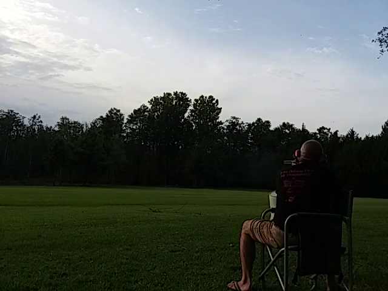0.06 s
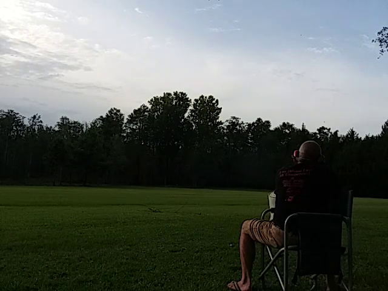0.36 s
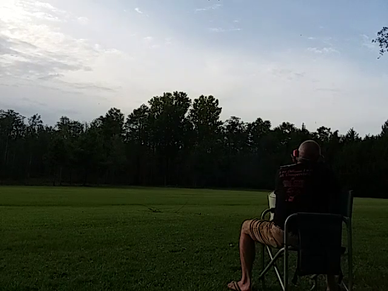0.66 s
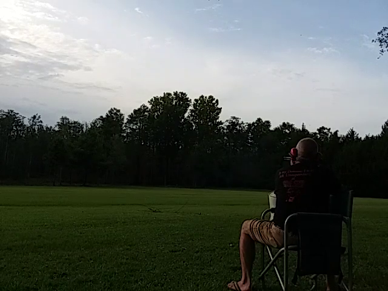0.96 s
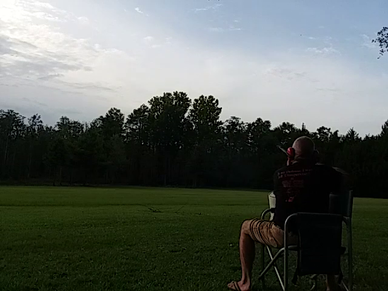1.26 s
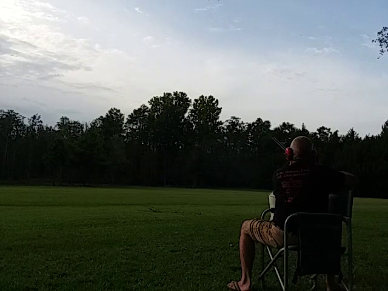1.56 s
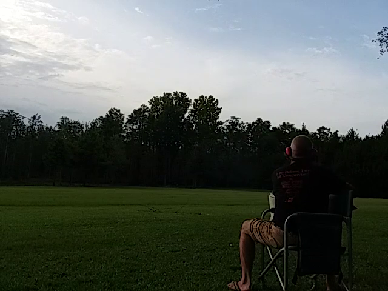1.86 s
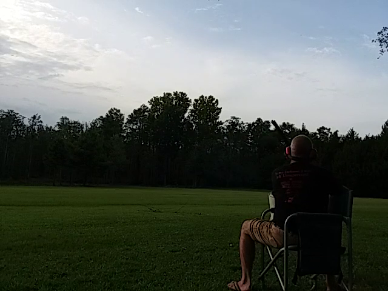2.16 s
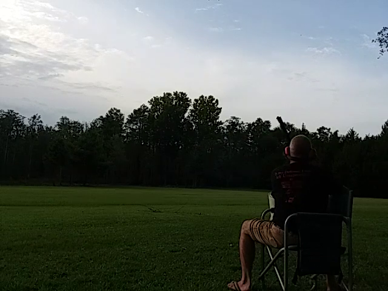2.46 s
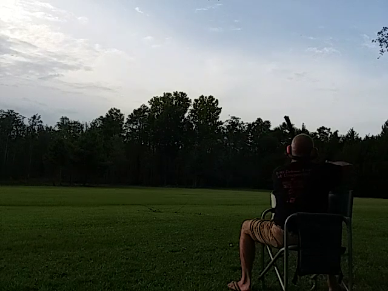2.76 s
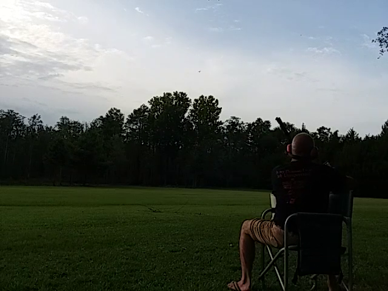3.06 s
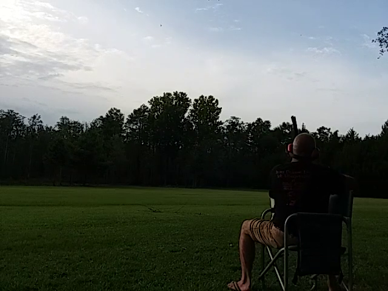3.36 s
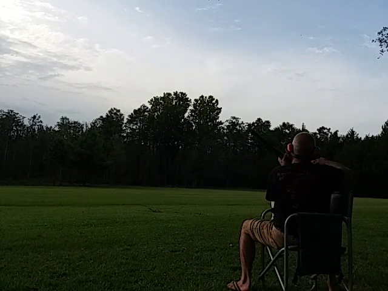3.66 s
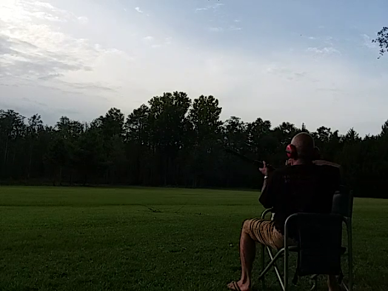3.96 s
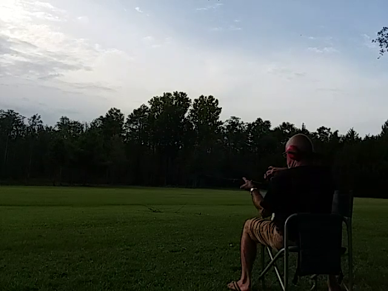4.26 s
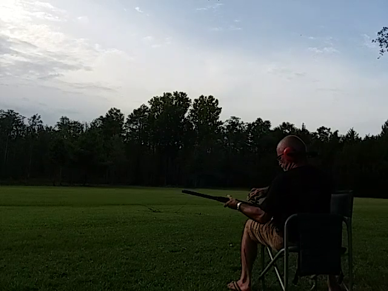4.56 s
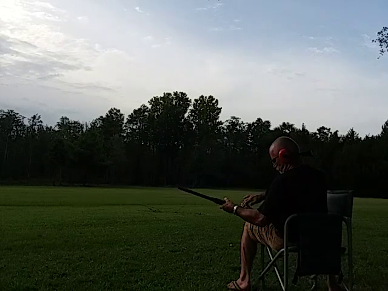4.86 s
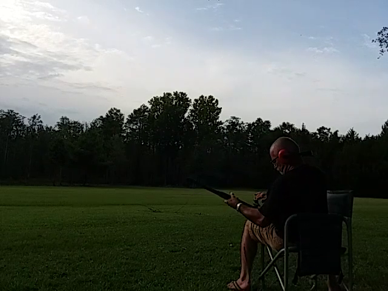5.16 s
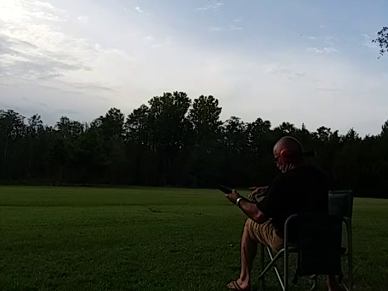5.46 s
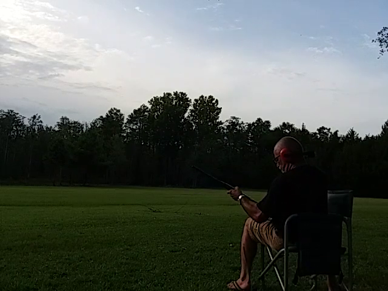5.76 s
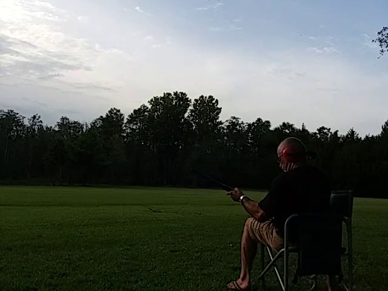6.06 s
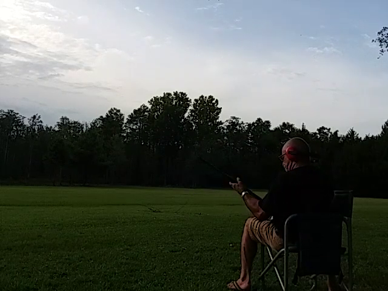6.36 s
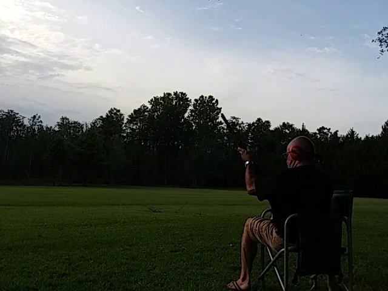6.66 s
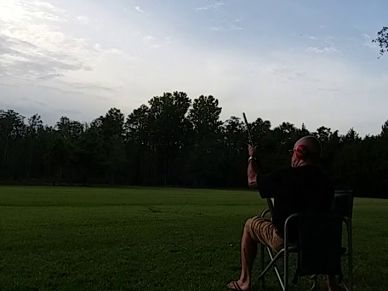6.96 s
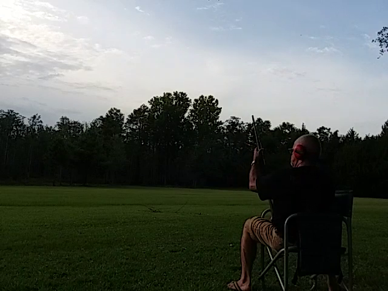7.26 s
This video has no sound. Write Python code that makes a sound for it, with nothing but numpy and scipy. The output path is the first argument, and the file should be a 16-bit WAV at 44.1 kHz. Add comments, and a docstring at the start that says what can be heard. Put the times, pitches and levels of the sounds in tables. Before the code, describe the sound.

One loud rifle shot echoes across an open field, then a lever clicks and clacks and a folding chair creaks.

```python
"""One rifle shot over a mown field at dusk: a saturated muzzle blast with a short wash over the grass.
Near trees slap it back; stands of woods return a crackle of trunk echoes and a low roll.
The seated shooter works the lever: steel slides, strikes and rings the stock and receiver.
A folding chair creaks as its loaded joint sticks and slips, and clothing brushes.
Insects sing behind it all, over a distant low rumble."""
import sys
import numpy as np
from scipy import signal
from scipy.fft import rfft, irfft, next_fast_len
from scipy.io import wavfile
from scipy.ndimage import uniform_filter1d

SR = 44100
rng = np.random.default_rng(int(sys.argv[2]) if len(sys.argv) > 2 else 0)


def generate_wav(signal):
    """Clip the signal to [-1, 1] and save it as 16-bit WAV at the path in sys.argv[1]."""
    frames = np.transpose(np.atleast_2d(signal))
    scaled = np.clip(frames, -1, 1) * 32767
    pcm = np.round(scaled).astype(np.int16)
    wavfile.write(sys.argv[1], SR, pcm)


N = 332073
T = np.arange(N) / SR
BURST_SAMPLES = 4096
BURST_T = T[:BURST_SAMPLES]


# Blast spectrum: freq_hz, density_db
BLAST_SPECTRUM = [(30, -33.5), (55, -12.5), (110, -1.5), (260, 0), (400, -8), (720, -3), (1100, -8),
                  (2000, -1), (3300, -12), (7000, -11.5), (15500, -22.5)]

def muzzle_blast(drive=0.57, hold_s=0.036, push_s=0.055, fall_db_per_s=316.5, wash_db_per_s=131):
    """A saturated roar holds, drops fast and leaves a slower wash; low push and treble die first."""
    roar = unit_rms(np.tanh(drive * noise(BLAST_SPECTRUM, N)))
    dull = signal.sosfilt(signal.butter(1, 2800, fs=SR, output="sos"), roar)
    treble_db = -2 - 3 * np.minimum(T / 0.016, 2)
    roar = dull + amp(treble_db) * (roar - dull)
    thin = signal.sosfiltfilt(highpass(170), roar)
    push = (roar - thin) * np.exp(-(T / push_s) ** 4)
    blast_db = -15.5 - fall_db_per_s * np.maximum(T - hold_s, 0)
    wash_db = -14.5 - wash_db_per_s * T
    return (thin + push) * amp(np.maximum(blast_db, wash_db))


# Near-tree echoes: start_s, level_db
TREE_SLAPS = [(.049, -23.5), (.1313, -20.5), (.155, -16), (.173, -22.5), (.203, -12.5), (.235, -14),
              (.257, -18.5), (.291, -14), (.342, -18), (.488, -24)]
# Slap spectrum: freq_hz, density_db
SLAP_SPECTRUM = [(100, -8.5), (400, -20.5), (900, 6), (2100, 10), (3200, 3), (4500, -7),
                 (8500, -28.5), (11000, -27.5), (15500, -31)]

def tree_slaps():
    """Near trees each throw back one short, ragged echo."""
    out = np.zeros((2, N))
    for start_s, level_db in TREE_SLAPS:
        add(out, start_s, amp(level_db) * burst(SLAP_SPECTRUM, decay_s=0.0055, rise_s=0.0009))
    return out


# Trunk-echo spectrum: freq_hz, density_db
CRACKLE_SPECTRUM = [(150, -39.5), (380, -27), (520, -12), (750, -4.5), (1100, 1.5), (1600, 4), (2400, 2.5),
                    (3600, -2), (5000, -5.5), (8000, -3), (10500, -8.5), (15500, -2.5)]

def trunk_crackle(gain_db=2):
    """Each trunk returns a click; later ones crowd together and lose their treble to the air."""
    clicks_per_s = 3500 + 9000 * T
    clicks = rng.standard_normal((2, N)) * (rng.random(N) < clicks_per_s / SR)
    clicks /= np.sqrt(uniform_filter1d((clicks ** 2).mean(0), size=1200) + 1e-9)
    hz, t, spectra = signal.stft(clicks, SR, nperseg=512)
    hz = hz[:, None]
    air_loss_db = 8 * (hz / 1000) ** 0.89 * t ** 0.86
    shape = amp(db_at(CRACKLE_SPECTRUM, hz) - air_loss_db)
    mids = (hz > 700) & (hz < 2500)
    shape /= np.sqrt((shape ** 2 * mids).mean(0))
    return amp(gain_db) * signal.istft(mic_pair(spectra, hz) * shape, SR, nperseg=512)[1][:, :N]


# Roll spectrum before it sinks: freq_hz, density_db
ROLL_SPECTRUM = [(25, -35.5), (42, -41), (60, -40.5), (90, -9), (130, -3), (185, 1.5), (240, -2),
                 (310, -11), (420, -23), (900, -64.5)]

def low_roll(sink_per_s=0.1, bass_db_per_octave=-13, deepen_s=0.45):
    """The thunder of far woods deepens as the path grows."""
    hz, t, spectra = signal.stft(rng.standard_normal((2, N)), SR, nperseg=4096)
    hz = hz[:, None]
    octaves_below = np.log2(np.maximum(170 / (hz + 1), 1))
    bass_db = bass_db_per_octave * octaves_below * np.exp(-t / deepen_s)
    shape = amp(db_at(ROLL_SPECTRUM, hz * (1 + sink_per_s * t)) + bass_db)
    roll = signal.istft(mic_pair(spectra, hz) * shape, SR, nperseg=4096)[1][:, :N]
    return roll / np.sqrt(uniform_filter1d((roll ** 2).mean(0), size=3000))


# Stands of woods: distance_m, depth_m, crackle_db, roll_db
WOOD_STANDS = [(40, 8.7, -29, -30), (62.76, 13, -24.5, -40.5), (83.3, 15, -32.5, -31),
               (214.5, 30, -38, -34.5), (269, 31, -40, -32), (314, 21, -60, -35.5), (464, 51, -57.5, -39),
               (560, 20, -67.5, -48.5)]

def woods_echo(sound_m_per_s=343):
    """Each stand swells over its depth, peaks after the round trip and fades; far ones linger."""
    power = 0
    for distance_m, depth_m, crackle_db, roll_db in WOOD_STANDS:
        delay_s, swell_s = 2 * distance_m / sound_m_per_s, 2 * depth_m / sound_m_per_s
        rise = np.exp(-(np.minimum(T - delay_s, 0) / swell_s) ** 2 / 2)
        fade_db_per_s = 22.5 / delay_s ** 0.39
        fade = amp(-fade_db_per_s * np.maximum(T - delay_s, 0))
        power += (amp([[crackle_db], [roll_db]]) * rise * fade) ** 2
    crackle_gain, roll_gain = np.sqrt(power)
    return crackle_gain * trunk_crackle() + roll_gain * low_roll()


# Bolt and lever travel: start_s, end_s, level_db
STEEL_SLIDES = [(2.563, 2.654, -52.5), (3.154, 3.275, -60.5), (5.737, 5.82, -41), (7.449, 7.54, -46.5)]
# Scrape spectrum: freq_hz, density_db
SCRAPE_SPECTRUM = [(300, -23), (900, -1.5), (1500, -5), (2000, 3.5), (2700, -4.5), (6000, -12.5),
                   (8700, -12.5), (10500, -24.5), (15500, -19.5)]

def steel_scrape(grit_db=2):
    """Steel drags on steel: a fine scrape, loudest where the receiver rings."""
    grit = amp(grit_db * unit_rms(uniform_filter1d(rng.standard_normal(N), size=130)))
    pressure = sum(amp(level_db) * gate(start_s, end_s) for start_s, end_s, level_db in STEEL_SLIDES)
    return noise(SCRAPE_SPECTRUM, N) * grit * uniform_filter1d(pressure, size=300)


# Steel strikes: start_s, knock_db, focus_hz, snap_db
# Grip shifts 1.7 s, lever opens 2.6 s, bolt stops 3 s, handling 5 s, lever shuts 5.8 s,
# rifle raised 6.7 s, lever worked again 7.5 s.
STRIKES = [(1.734, -69, 1800, -59.5), (2.563, -35, 1660, -49.5), (2.631, -35, 2020, -45.5),
           (2.6568, -26, 1970, -51), (2.665, -16.5, 1860, -31.5), (2.674, -23, 2020, -32),
           (3.035, -31, 1930, -51.5), (3.0475, -20.5, 1980, -35), (3.202, -38, 1570, -66),
           (3.248, -37.5, 1580, -57), (4.991, -28, 1790, -42), (5.001, -29, 840, -60),
           (5.283, -44.5, 1680, -65), (5.307, -39, 1720, -61), (5.313, -32.5, 2240, -45),
           (5.7346, -23.5, 1650, -38), (5.7577, -22.5, 1670, -33), (5.7844, -21, 1660, -22.5),
           (5.802, -23.5, 980, -58), (6.738, -60, 1690, -71), (6.755, -43.5, 1400, -67),
           (6.973, -54, 1600, -56), (7.4569, -26.5, 1590, -30), (7.481, -23.5, 1627, -32.5),
           (7.505, -13, 1500, -23.5)]

def contacts(gap_s=0.006, touch_db=-17.5, rebound_db=-5.5, soft_db=-8.5, chatter_per_s=110):
    """Parts touch, strike and rebound, and chatter as they slide. Rows as in STRIKES."""
    rows = []
    for start_s, knock_db, focus_hz, snap_db in STRIKES:
        rows += [(start_s - gap_s, knock_db + touch_db, focus_hz, snap_db + touch_db + soft_db),
                 (start_s, knock_db, focus_hz, snap_db),
                 (start_s + gap_s, knock_db + rebound_db, focus_hz, snap_db + rebound_db + soft_db)]
    for start_s, end_s, level_db in STEEL_SLIDES:
        times_s = start_s + np.cumsum(rng.uniform(0.5, 1.5, size=24)) / chatter_per_s
        forces_db = level_db + 3 * rng.standard_normal(24)
        rows += [(s, db + 7.5, 1650, db - 4.5) for s, db in zip(times_s, forces_db) if s < end_s]
    return rows


# Wooden stock and receiver modes: pitch_hz, level_db, t60_s
BODY_MODES = [(330, 2, 0.046), (648, 0.5, 0.043), (847, 8.5, 0.03), (972, -1, 0.041), (1183, -17, .045),
              (1474, -8, 0.049), (1523, -9.5, 0.097), (1610, -8, 0.058), (1829, 0, 0.026),
              (1934, -9, 0.082), (2035, -4.5, 0.042), (2204, -10.5, 0.046)]
# Thin steel modes: pitch_hz, level_db, t60_s
STEEL_MODES = [(3634, -5.5, .06), (4400, -5.5, 0.04), (5860, 3, .08), (6780, -7, .09), (7310, -9.5, 0.089),
               (7935, -25, .08), (8440, 2, 0.03)]
# Loose metal part modes: pitch_hz, level_db, t60_s
CLINK_MODES = [(5950, 1, .08), (6100, 4.5, .06), (12600, -2.5, .1)]
# Bright part of a contact: freq_hz, density_db
SNAP_SPECTRUM = [(150, -11.5), (500, -18.5), (1000, 1.5), (2000, 4.5), (3000, 2), (5000, 2), (8200, 1.5),
                 (10500, -7), (15500, -3)]
# Dull part of a contact: freq_hz, density_db
THUD_SPECTRUM = [(100, -10.5), (220, -3.5), (450, -5), (1000, 6.5), (2100, 2.5), (3000, -7), (6000, -45.5)]

def lever_action(focus_db_per_octave=24, clink_db=-56.5):
    """Contacts snap, ring the steel and knock the body; a loose part clinks at each strike."""
    bright, knocks = steel_scrape(), np.zeros((2, N))
    for start_s, *_ in STRIKES:
        scratch = amp(-8) * burst(SNAP_SPECTRUM, decay_s=0.0089)
        clink = ring(CLINK_MODES, amp(5 * rng.standard_normal(len(CLINK_MODES))))
        add(bright, start_s, amp(clink_db) * (clink + scratch))
    for start_s, knock_db, focus_hz, snap_db in contacts():
        octaves_off = abs(np.log2(np.transpose(BODY_MODES)[0] / focus_hz))
        thud = amp(-5) * burst(THUD_SPECTRUM, decay_s=0.005)
        body = amp(4.5) * ring(BODY_MODES, amp(-focus_db_per_octave * octaves_off), rise_s=0.0012)
        add(knocks, start_s, amp(knock_db) * (body + thud))
        snap = amp(10) * burst(SNAP_SPECTRUM, decay_s=0.004)
        steel = amp(-7) * ring(STEEL_MODES, 1)
        add(bright, start_s, amp(snap_db) * (snap + steel))
    bright = signal.sosfilt(highpass(260), bright)  # small parts radiate no bass
    bright = reflect(bright, left_db=-0.4, near_db=-2, near_t60_s=0.13, far_db=-10.5, far_t60_s=0.46)
    knocks = reflect(knocks, left_db=0.5, near_db=-16.5, near_t60_s=0.11, far_db=-22.5, far_t60_s=0.58)
    return bright + knocks


# Chair joint slips: start_s, level_db
JOINT_SLIPS = [(3.978, -35.5), (4.01, -26), (4.046, -28), (4.054, -26.5), (4.0952, -24.5), (4.140, -21.5),
               (4.1785, -20.5), (4.215, -21.5), (4.251, -19.5), (4.2864, -20.5), (4.328, -21),
               (4.403, -47.5), (4.439, -30), (4.504, -33), (4.644, -53.5)]
# Weight on the joint: time_s, load_fraction
JOINT_LOAD = [(3.98, 0), (4.015, .02), (4.06, 0.48), (4.1, 0.55), (4.33, .68), (4.45, 0.97)]
# Hollow frame modes: base_pitch_hz, level_db, t60_s
FRAME_MODES = [(630.5, -1.5, 0.046), (698, 6.5, 0.012), (860, -12, 0.013), (1056, -35, 0.0053),
               (1475, -14.5, 0.023), (2060, -10.5, 0.016), (2860, -17.5, 0.019), (3037, -21, .024)]
# Joint rasp spectrum: freq_hz, density_db
RASP_SPECTRUM = [(250, 23.5), (450, -9), (950, 15.5), (1300, -2), (2900, 2), (3900, -16),
                 (9000, -17.5), (15000, -47)]

def chair_creak(gain_db=8, wander=0.011):
    """Each slip rasps and knocks the frame; load raises the pitch and wakes the upper modes."""
    out = np.zeros((2, N))
    upper = np.transpose(FRAME_MODES)[0] > 900
    for start_s, level_db in JOINT_SLIPS:
        load = np.interp(start_s, *np.transpose(JOINT_LOAD))
        sharp_db = -19.5 + 30 * load
        rasp = amp(sharp_db - 18) * burst(RASP_SPECTRUM, decay_s=0.009, rise_s=0.0013)
        pitch_ratio = (0.94 + 0.11 * load ** 2) * (1 + wander * rng.standard_normal())
        modes = np.multiply(FRAME_MODES, [pitch_ratio, 1, 1])
        knock = ring(modes, amp(upper * sharp_db), rise_s=0.0016, phase_spread=0.15)
        add(out, start_s, amp(level_db + gain_db) * (knock + rasp))
    out = signal.sosfilt(highpass(370), out)
    return reflect(out, left_db=3.2, near_db=-17, near_t60_s=0.09, far_db=-24, far_t60_s=0.35)


# Clothing brushes: centre_s, half_length_s, level_db
CLOTH_BRUSHES = [(3.3, 0.11, -63.5), (3.75, 0.11, -69.5), (4.48, 0.11, -64.5), (6.3, 0.26, -69),
                 (6.517, 0.064, -62.5), (6.844, 0.16, -68.5)]
# Cloth spectrum: freq_hz, density_db
CLOTH_SPECTRUM = [(200, -1), (600, 1), (1100, -3), (1800, 1.5), (3000, -22), (5000, -14), (12000, -25)]

def clothing():
    """Cloth rubs with each turn and lift, swelling and sinking evenly."""
    rub = sum(amp(db) * np.exp(-((T - s) / half_s) ** 2) for s, half_s, db in CLOTH_BRUSHES)
    return rub * noise(CLOTH_SPECTRUM, N)


# Insect chorus bands: centre_hz, width_hz, level_db
CHORUS_BANDS = [(5140, 550, -83.5), (6820, 710, -78), (7950, 1900, -83.5), (9140, 3200, -80),
                (13700, 1400, -81)]
# Katydid bouts: start_s, end_s
KATYDID_BOUTS = [(3.48, 5.2), (5.42, 5.6), (6.7, 7.4)]

def insects():
    """A steady high chorus, and one near katydid singing in bouts."""
    chorus = sum(amp(db) * noise_band(hz, width_hz) for hz, width_hz, db in CHORUS_BANDS)
    bouts = uniform_filter1d(sum(gate(*bout) for bout in KATYDID_BOUTS), size=3000)
    return chorus + amp(-84) * bouts * noise_band(centre_hz=14000, width_hz=130)


# Distant rumble and hiss: freq_hz, density_db
RUMBLE_SPECTRUM = [(15, -36), (25, -31.5), (45, -3), (116, 1), (140, -2.5), (227, -9.5), (378, -23),
                   (410, -20.5), (804, -26.5), (1850, -32), (3530, -41.5), (6730, -39), (11800, -46.5),
                   (13500, -42), (15500, -46)]

def field(gain_db=1.57, dip_db=-22, hold_s=0.93, return_s=0.4):
    """Rumble, hiss and insects; the level dips under the shot and returns."""
    background = insects() + amp(-56.5) * noise(RUMBLE_SPECTRUM, N)
    dip = np.exp(-(np.maximum(T - hold_s, 0) / return_s) ** 2)
    return background * amp(gain_db + dip_db * dip)


def amp(db):
    """Decibels to gain."""
    return 10 ** (np.asarray(db) / 20)


def unit_rms(x):
    """Scales to rms 1."""
    return x / np.sqrt(np.mean(x ** 2) + 1e-20)


def db_at(spectrum, hz):
    """Interpolates a spectrum table in log frequency."""
    freq_hz, db = np.transpose(spectrum)
    return np.interp(np.log(hz + 1), np.log(freq_hz), db)


def gate(start_s, end_s):
    """1 between the two times, else 0."""
    return 1.0 * ((T > start_s) & (T < end_s))


def highpass(cut_hz, order=2):
    """High-pass filter sections."""
    return signal.butter(order, cut_hz, "highpass", fs=SR, output="sos")


def add(mix, start_s, sound):
    """Mixes a stereo sound in."""
    part = mix[:, max(round(start_s * SR), 0):][:, :sound.shape[1]]
    part += sound[:, :part.shape[1]]


def noise(spectrum, size):
    """Coloured noise at two microphones."""
    hz = np.fft.rfftfreq(size, 1 / SR)
    white = rfft(rng.standard_normal((2, size)))
    return unit_rms(irfft(mic_pair(white, hz) * amp(db_at(spectrum, hz)), size))


def noise_band(centre_hz, width_hz):
    """An independent band of noise at each microphone."""
    hz = np.fft.rfftfreq(N, 1 / SR)
    shape = np.exp(-2 * ((hz - centre_hz) / width_hz) ** 2)
    return unit_rms(irfft(rfft(rng.standard_normal((2, N))) * shape, N))


def burst(spectrum, decay_s, rise_s=0.00046):
    """Noise with a fast rise and an exponential decay."""
    return noise(spectrum, BURST_SAMPLES) * np.exp(-BURST_T / decay_s) * (1 - np.exp(-BURST_T / rise_s))


def ring(modes, gains, rise_s=0.0005, phase_spread=0.93, left_lag_s=0.0001):
    """Struck modes die away; they sound from the right, so the left microphone lags."""
    hz, db, t60_s = np.transpose(modes)[:, :, None]
    weights = amp(db) * np.reshape(gains, (-1, 1))
    phase = phase_spread * rng.uniform(-np.pi, np.pi, hz.shape)
    envelope = amp(-60 * BURST_T / t60_s) * (1 - np.exp(-BURST_T / rise_s))
    envelope *= weights / np.linalg.norm(weights)
    return np.array([(envelope * np.sin(2 * np.pi * hz * (BURST_T - lag_s) + phase)).sum(0)
                     for lag_s in (left_lag_s, 0)])


def reflect(x, left_db, near_db, near_t60_s, far_db, far_t60_s):
    """Direct sound, a quick cloud of close reflections, and a fainter, longer one."""
    t, tail = T[:SR], 0
    for db, t60_s in ((near_db, near_t60_s), (far_db, far_t60_s)):
        taps = rng.standard_normal((2, SR)) * amp(-60 * t / t60_s) * (1 - np.exp(-t / 0.009))
        tail += amp(db) * taps / np.linalg.norm(taps[0])
    direct = mic_colour(x) * amp([[left_db / 2], [-left_db / 2]])
    return direct + signal.oaconvolve(x, tail, axes=1)[:, :N]


def mic_pair(spectra, hz, alike_hz=540):
    """Long waves reach both microphones alike; the treble is unrelated."""
    left, other = spectra
    coherence = 1 / (1.0207 + (hz / alike_hz) ** 3)
    return np.array([left, coherence * left + np.sqrt(1 - coherence ** 2) * other])


# Microphone imbalance before the bass taper: freq_hz, left_minus_right_db
MIC_IMBALANCE = [(300, 1), (600, -4.5), (1100, 4), (1900, 4.5), (3500, 0.5), (7000, 0.5), (10500, 12.5),
                 (15000, 2)]

def mic_colour(x, taper_hz=600):
    """The two microphones colour sound from ahead differently."""
    size = next_fast_len(N + 4096)
    hz = np.fft.rfftfreq(size, 1 / SR)
    tilt_db = db_at(MIC_IMBALANCE, hz) * np.minimum(hz / taper_hz, 1) / 2
    return irfft(rfft(x, size) * amp([tilt_db, -tilt_db]), size)[:, :N]


def scene():
    """The blast overloads both microphones alike; then echoes, the field and handling."""
    blast = muzzle_blast()
    ahead = tree_slaps() + woods_echo() + clothing() + field()
    return blast + mic_colour(ahead) + chair_creak() + lever_action()


def record(dry, low_cut_hz=50, high_cut_hz=15900, ceiling_db=-5):
    """The microphones round off the tallest peaks and shed the deepest bass; then the band limit."""
    rounded = amp(ceiling_db) * np.tanh(dry / amp(ceiling_db))
    trimmed = signal.sosfilt(highpass(low_cut_hz, order=4), rounded)
    lowpass = signal.firwin(511, high_cut_hz, window=("kaiser", 9), fs=SR)
    return signal.oaconvolve(trimmed, lowpass[None], "same")


dry = scene()
out = record(dry)
generate_wav(out)
```